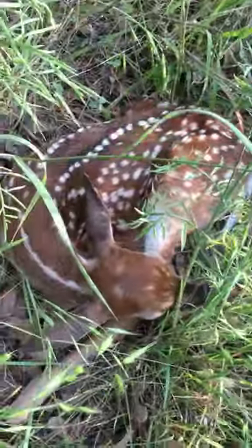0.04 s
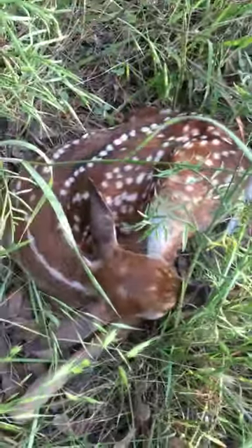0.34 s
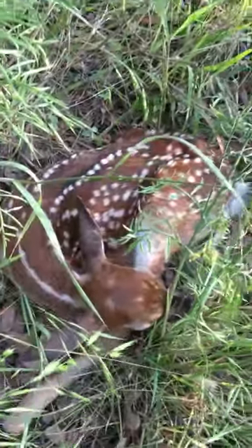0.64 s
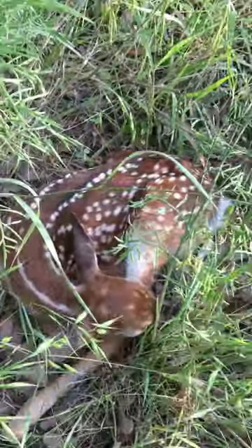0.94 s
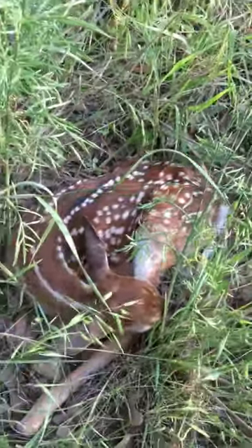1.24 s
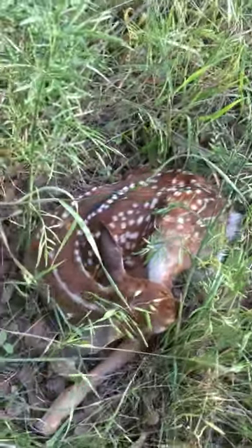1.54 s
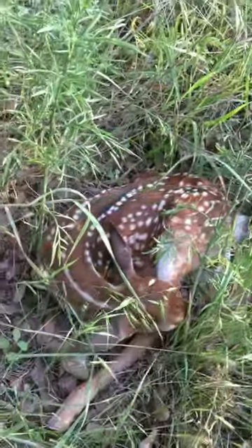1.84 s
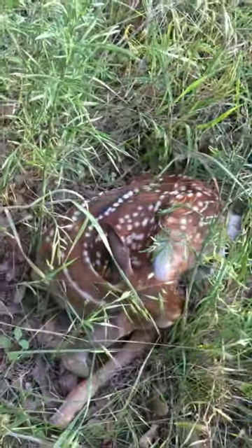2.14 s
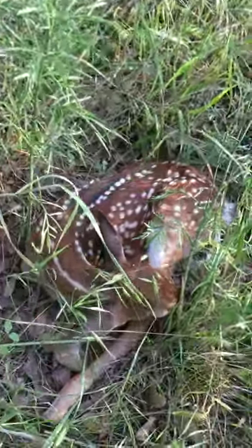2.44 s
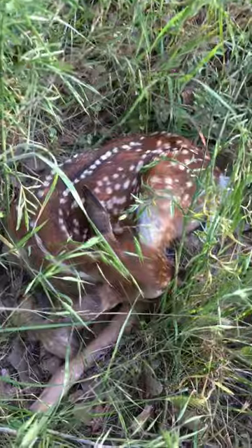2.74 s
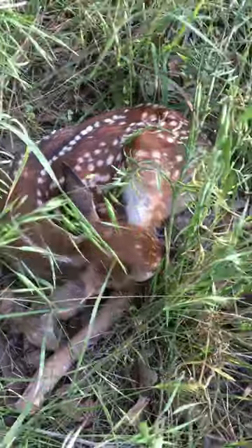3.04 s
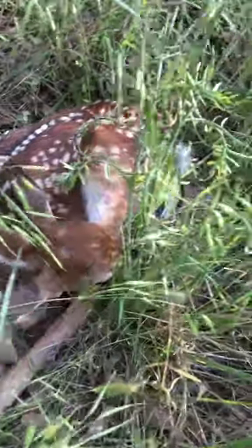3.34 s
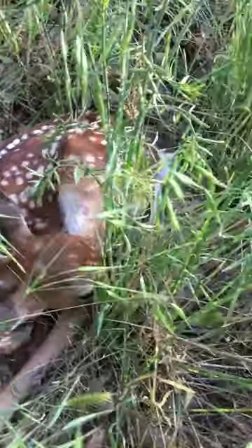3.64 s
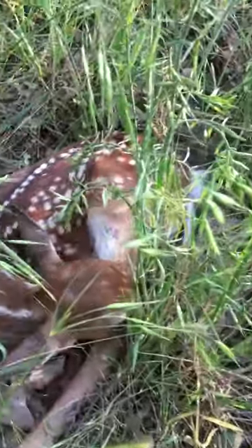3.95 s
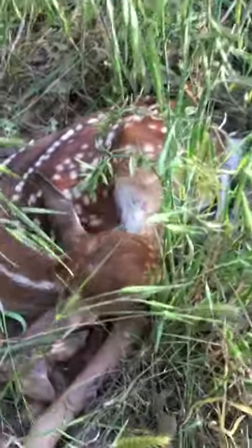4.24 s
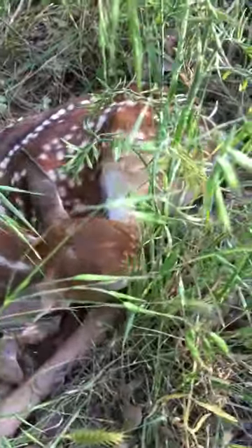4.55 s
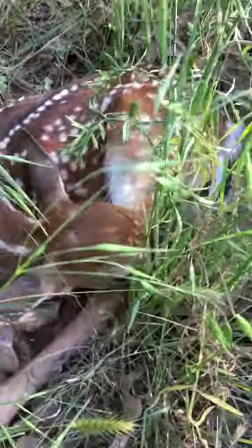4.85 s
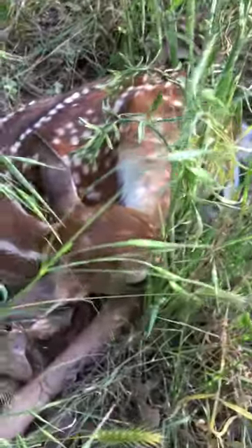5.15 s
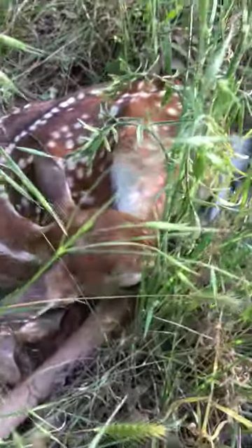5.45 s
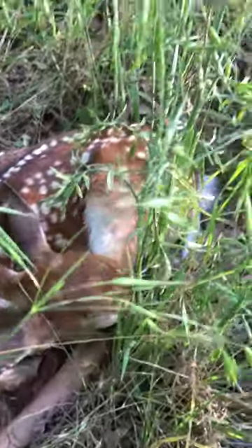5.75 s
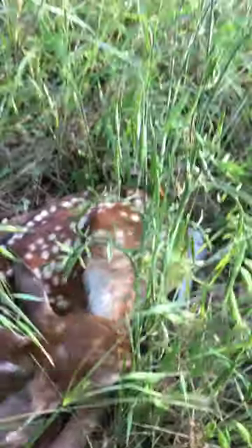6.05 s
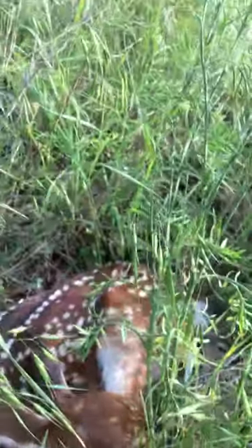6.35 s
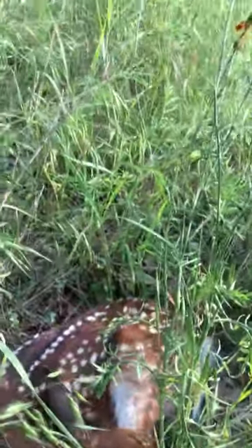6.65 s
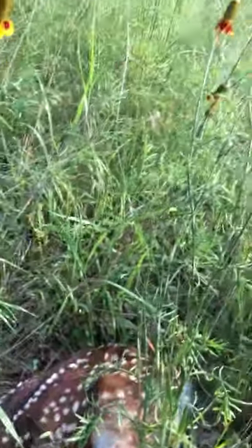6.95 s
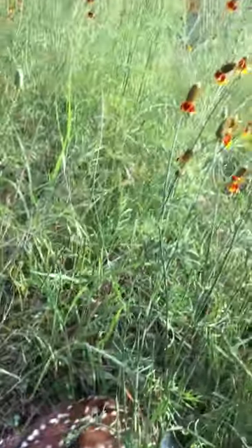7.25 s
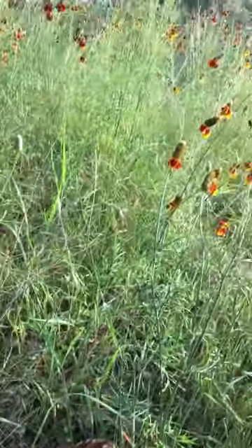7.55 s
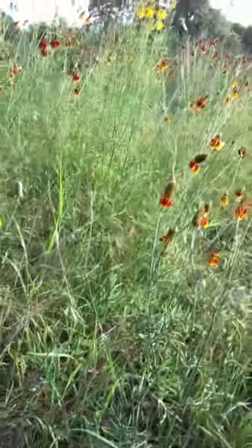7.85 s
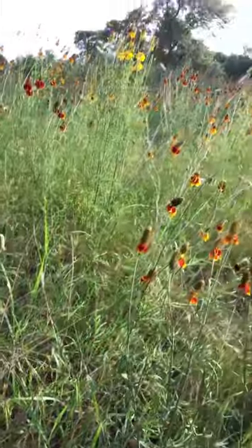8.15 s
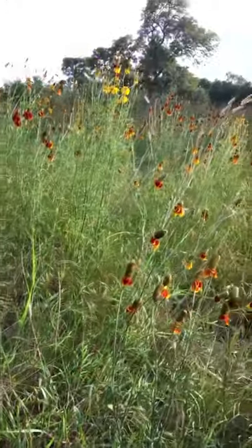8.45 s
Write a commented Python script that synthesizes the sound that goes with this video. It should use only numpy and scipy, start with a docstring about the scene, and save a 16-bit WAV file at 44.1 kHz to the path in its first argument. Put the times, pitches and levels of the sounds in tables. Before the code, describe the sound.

In a field of tall grass, a thin, high insect buzz runs throughout over a low drone and faint hiss. A bird gives a quick upward whistle, dry stems tick and far traffic dies away. Midway, close footsteps push through the grass with a sharp twig crack, crackling rustles and a dull scuff of soil. The rustling settles and distant birds whistle short, mostly rising notes.

```python
"""In a meadow of tall grass, katydids buzz by stridulation: each wing stroke draws a scraper along a
file of teeth, giving one arching tone near 9.5 kHz. Someone shifts in the grass, so blades rustle, stems
tick, twigs snap and the soil scuffs underfoot. Far birds whistle gliding notes, most of them rising.
Beneath lie a low rumble, a drone and a fine hiss; a soft, hollow rush of distant traffic and the hum
of a far engine fade early on."""
import sys
import numpy as np
from scipy import signal
from scipy.fft import rfft, irfft, next_fast_len
from scipy.io import wavfile
from scipy.ndimage import map_coordinates

SR = 44100
rng = np.random.default_rng(int(sys.argv[2]) if len(sys.argv) > 2 else 0)


def generate_wav(signal):
    """Clip the signal to [-1, 1] and save it as 16-bit WAV at the path in sys.argv[1]."""
    frames = np.transpose(np.atleast_2d(signal))
    scaled = np.clip(frames, -1, 1) * 32767
    pcm = np.round(scaled).astype(np.int16)
    wavfile.write(sys.argv[1], SR, pcm)


N = 374409


def amp(db):
    """Decibels to amplitude gain."""
    return 10 ** (np.asarray(db) / 20)


def unit(x):
    """Normalisation to rms 1."""
    return x / np.sqrt(np.mean(x ** 2) + 1e-20)


def curves(rows):
    """Linear interpolation: one value per sample for each column after the time."""
    s, *cols = np.transpose(rows)
    return [np.interp(np.arange(N) / SR, s, c) for c in cols]


def wobble(rate):
    """Random modulation: a smooth curve with rate knots a second."""
    return map_coordinates(rng.standard_normal(int(N * rate / SR) + 4), [np.arange(N) * rate / SR])


def coloured(x, points):
    """Spectral shaping of x by (Hz, dB) points on a log frequency axis, at rms 1."""
    f, db = np.transpose(points)
    size = next_fast_len(2 * len(x))
    hz = np.fft.rfftfreq(size, 1 / SR)
    gain = amp(np.interp(np.log(hz + 1), np.log(f), db))
    return unit(irfft(rfft(x, size) * gain, size)[:len(x)])


def noise(points):
    """Stationary noise with the given spectrum."""
    return coloured(rng.standard_normal(N), points)


def add(track, s, sound):
    """Superposition of a short sound on the track at time s."""
    part = track[max(round(s * SR), 0):][:len(sound)]
    part += sound[:len(part)]


def scattered(x, t60, wet_db):
    """Scattering: x plus weak echoes from plants, which change as the microphone moves."""
    t, echo, hop = np.arange(SR // 4) / SR, np.zeros(N), SR // 8
    padded = np.pad(x, (0, 2 * hop))
    for start in range(0, N, hop):
        tail = rng.standard_normal(len(t)) * amp(-60 * t / t60)
        piece = padded[start:start + 2 * hop] * np.sin(np.linspace(0, np.pi, 2 * hop))
        add(echo, start / SR, signal.fftconvolve(piece, tail / np.linalg.norm(tail)))
    return x + amp(wet_db) * echo


# One wing stroke. Each row: share of the cycle, tooth strike rate in Hz at pitch 1, relative level in dB.
WING_STROKE = [(0, 8600, -50), (.15, 8500, -35), (.23, 8850, -5.5), (.35, 9250, -1.5), (.45, 9490, 0),
               (.53, 9550, 0), (.62, 9400, -1), (.72, 8950, -4.5), (.82, 8400, -11.5), (.9, 7950, -26),
               (1, 7900, -50)]

def stridulate(rate, pitch, slip, scatter_db):
    """Stridulation: the scraper speeds up and slows along the file, so each stroke arches in pitch."""
    cycle = np.cumsum(rate * (1 + .003 * wobble(4) + .0089 * wobble(40))) / SR % 1
    share, hz, db = np.transpose(WING_STROKE)
    drift = 1 + .0025 * wobble(7)
    strikes = np.cumsum(pitch * drift * np.interp(cycle, share, hz)) / SR
    # the scraper never catches the teeth quite the same way twice
    tone = np.sin(2 * np.pi * strikes + slip * wobble(110) + .1 * wobble(1500))
    return unit(tone * amp(np.interp(cycle, share, db) + scatter_db * wobble(70)))


# The song. Each row: time in seconds, relative levels in dB of the nearest katydid and of the others.
SONG_LEVELS = [(0.1, -59, -69), (1.58, -58.5, -64.5), (3.01, -56.5, -66), (3.1, -55, -64.5),
               (5.46, -59, -66.5), (6.09, -58, -66), (6.87, -61.5, -65.5), (7.33, -57.5, -64),
               (8.4, -53, -63.5)]
# The strokes' low ends as the microphone tilts up. Each row: time in seconds, level in dB.
LOW_END_LEVEL = [(0, -92), (6, -87), (6.7, -79), (8.49, -77.5)]
# Farther katydids. Each row: strokes a second, pitch ratio to the nearest, relative level in dB.
FAR_SINGERS = [(60.8, 1.058, -10.5), (74.1, 1.079, -11), (57.64, 1.037, -11)]
# The farthest, merged. Each row: frequency in Hz, relative spectral density in dB.
CHORUS_SPECTRUM = [(8000, -45), (8600, -24), (9200, -6), (9600, -7.5), (10050, -6.5), (10300, -16),
                   (10430, -7.5), (10560, -41.5)]

def katydids():
    """Superposition: one close singer stands clear while farther ones blur into a chorus."""
    near_db, far_db = curves(SONG_LEVELS)
    singer = stridulate(rate=66.5, pitch=1, slip=1.1, scatter_db=.3)
    near = scattered(singer, t60=.02, wet_db=-19)
    flicker = amp(3 * wobble(25) + 2 * wobble(3))
    low_band = coloured(singer, [(6000, -20), (7800, -5), (8200, 0), (8600, -10), (9000, -40)])
    low_end = amp(curves(LOW_END_LEVEL)[0]) * flicker * low_band
    far = sum(amp(db) * stridulate(rate, pitch, slip=2, scatter_db=.6) for rate, pitch, db in FAR_SINGERS)
    chorus = unit(far) + amp(.5) * noise(CHORUS_SPECTRUM)
    return amp(near_db - .76) * unit(near) + low_end + amp(far_db + 4) * unit(chorus)


# Four background noises. Each row: frequency in Hz, relative spectral density in dB.
RUMBLE_SPECTRUM = [(12, -45), (24, -12.5), (36, -3), (56, 8.5), (72, 5), (94, 8.5), (115, 4.5), (150, -41)]
DRONE_SPECTRUM = [(80, -21), (128, 0), (155, 1.5), (180, -3.5), (250, -9), (315, -15.5), (400, -18.5),
                  (520, -25.5), (800, -46.5)]
TRAFFIC_SPECTRUM = [(350, -13.5), (500, -5.5), (630, 3), (900, 2.5), (1200, -1), (1500, -4), (2000, -13.5),
                    (3000, -21), (5000, -48)]
HISS_SPECTRUM = [(500, -10), (1500, 1), (2500, 2), (3500, 0), (4500, -2), (5500, -1), (6500, 0), (7700, -3),
                 (10800, .5), (11800, 2), (13000, 2.5), (16000, 2.5)]
# Their envelopes. Each row: time in seconds, relative level in dB.
RUMBLE_LEVEL = [(0.1, -56.5), (2.18, -49.5), (3.89, -56.5), (4.52, -50), (4.81, -54.5), (5.05, -51.5),
                (5.58, -58), (6.02, -51), (6.11, -62.5), (6.62, -51), (6.71, -59.5), (6.78, -46.5),
                (6.85, -54.5), (8.0, -54.5), (8.12, -60), (8.4, -54.5)]
DRONE_LEVEL = [(0.1, -54.5), (0.31, -56), (2.41, -54.5), (3.33, -52), (4.81, -55), (5.39, -52.5),
               (5.99, -55.5), (8.1, -54.5), (8.4, -56)]
TRAFFIC_LEVEL = [(0.05, -54), (0.54, -60), (1.1, -59), (2.33, -61.5), (2.72, -65.5), (3.17, -65.5),
                 (5.72, -68.5), (7.98, -65.5), (8.4, -66)]
# The traffic's hollow note. Each row: time in seconds, centre in Hz, level in dB over its broad rush.
HOLLOW_NOTE = [(0, 846.8, 5.5), (.4, 855, -1), (.7, 913, -1.5), (1.2, 1057, 0), (1.7, 921, -2),
               (2.4, 989, -3.5), (2.8, 909, -10), (8.49, 893, -31)]

def background():
    """Ambient noise in bands: rumble, drone, the soft, hollow rush of distant traffic and a hiss."""
    rumble = amp(curves(RUMBLE_LEVEL)[0]) * noise(RUMBLE_SPECTRUM)
    drone = amp(curves(DRONE_LEVEL)[0] + .14) * noise(DRONE_SPECTRUM)
    centre_hz, hollow_db = curves(HOLLOW_NOTE)
    # ring modulation carries narrow noise along the drifting centre
    carrier = np.sin(2 * np.pi * np.cumsum(centre_hz) / SR)
    hollow = unit(noise([(60, 4), (130, 1), (300, -12.5), (900, -65)]) * carrier)
    traffic = (noise(TRAFFIC_SPECTRUM) + amp(hollow_db) * hollow) / np.hypot(1, amp(hollow_db))
    hiss = amp(-70.4) * noise(HISS_SPECTRUM)
    return rumble + drone + amp(curves(TRAFFIC_LEVEL)[0] + 1) * traffic + hiss


# The engine's wavering lines. Each row: frequency in Hz, relative level in dB.
ENGINE_LINES = [(56, 2), (94, 3), (133, 2), (154, 0.5)]
# Their envelope. Each row: time in seconds, gain in dB.
ENGINE_LEVEL = [(0, -55.5), (.8, -56), (1.2, -57), (1.8, -60), (2.4, -61.5), (3, -74), (8.49, -77)]

def engine():
    """Attenuation with distance: only the lowest orders of a far engine carry across the field."""
    t = np.arange(N) / SR
    lines = sum(amp(db + .4 * wobble(10)) * np.sin(2 * np.pi * hz * t + .82 * wobble(7))
                for hz, db in ENGINE_LINES)
    return amp(curves(ENGINE_LEVEL)[0]) * lines


def crackle(rate, spread_db, points):
    """Shot noise: tiny fractures at random moments, each ringing briefly at its own pitch."""
    count = int(rate * N / SR)
    when, pitch, size = rng.random((count, 3)).T
    age = np.arange(48)  # samples
    hz = 1500 * 10 ** pitch
    turns = hz[:, None] * age / SR
    strength = amp(-spread_db * np.log(np.maximum(size, .004)))
    grains = strength[:, None] * np.sin(2 * np.pi * turns) * np.exp(-turns / 3.8)
    at = (when * N).astype(int)[:, None] + age
    return coloured(np.bincount(at.ravel(), grains.ravel(), N)[:N], points)


def swell(s, hold_s, fade_s):
    """Exponential envelope of a contact: it rises 20 dB in fade_s, holds from time s, falls as fast."""
    t = np.arange(N) / SR
    outside = np.maximum(np.maximum(s - t, t - s - hold_s), 0)
    return amp(-20 * outside / fade_s)


# Rustling blades and stems. Each row: frequency in Hz, relative spectral density in dB.
BLADE_SPECTRUM = [(5000, -27), (7000, -15), (9000, -13), (11500, 8), (13500, 13.5), (16000, 10)]
STEM_SPECTRUM = [(300, -10.5), (550, -7), (1500, -10), (2500, -2.5), (4500, -1.5), (5800, 2.5), (8000, 1.5),
                 (11000, -11)]
# Blades stirring between brushes. Each row: time in seconds, level in dB.
STIR_LEVEL = [(0, -75), (2.5, -90), (5.8, -78), (6.8, -85), (8.49, -91)]
# Legs brushing the grass. Each row: start, hold and fade in seconds, blade and stem levels in dB.
BRUSHES = [(.62, 0.055, .1, -71, -76), (2.19, .17, .25, -64, -73), (2.787, .2, 0.38, -65.5, -71),
           (3.154, 0.19, 0.23, -50, -57), (3.536, 0.054, 0.17, -51.5, -56.5), (3.68, 0.085, 0.55, -62, -65),
           (4.13, .13, 0.65, -67, -68), (4.36, 0.18, .15, -70, -71.5), (4.857, .04, .1, -67, -82),
           (5.87, 0.035, .15, -65, -88), (5.94, 0.021, 0.066, -57, -74), (6.143, .025, .07, -63, -84)]

def grass():
    """Incoherent sources add in power: light touches crackle, a firm push merges them into a swish."""
    stir = amp(curves(STIR_LEVEL)[0])
    blades_power, stems_power = stir ** 2, (amp(-3.5) * stir) ** 2
    for s, hold_s, fade_s, blades_db, stems_db in BRUSHES:
        push = swell(s, hold_s, fade_s)
        blades_power += (amp(blades_db) * push) ** 2
        stems_power += (amp(stems_db) * push) ** 2
    swish = np.clip(.32 + .057 * (10 * np.log10(blades_power) + 69), .3, 1.2)
    blades = crackle(rate=2200, spread_db=5, points=BLADE_SPECTRUM) + swish * noise(BLADE_SPECTRUM)
    stems = crackle(rate=2800, spread_db=4.5, points=STEM_SPECTRUM) + swish * noise(STEM_SPECTRUM)
    clumps = amp(2 * wobble(28))  # blades catch and let go in clumps
    return clumps * (np.sqrt(blades_power) * blades + np.sqrt(stems_power) * stems) / np.hypot(1, swish)


# Bent stalks ticking. Each row: time in seconds, level in dB.
CREEP_LEVEL = [(0, -78), (4.6, -77), (6.2, -78), (6.8, -86), (8.49, -88)]

def stalks():
    """Elastic recovery: bent stalks creep back with fine ticks until the walker stands still."""
    return amp(curves(CREEP_LEVEL)[0]) * crackle(rate=110, spread_db=3.8, points=BLADE_SPECTRUM)


def whistle(length_s, glide_hz, bend=1):
    """Frequency glide: a pure tone swells and fades between two pitches; more bend delays the glide."""
    progress = np.linspace(0, 1, int(length_s * SR))
    start_hz, end_hz = glide_hz
    hz = start_hz * (end_hz / start_hz) ** (progress ** bend)
    return np.sin(np.pi * progress) * np.sin(2 * np.pi * np.cumsum(hz) / SR)


# One bird's quick upward whips. Each row: start and length in seconds, relative level in dB.
WHIPS = [(0.043, 0.1, -57), (.41, .075, -69), (8.012, 0.056, -61.5), (8.282, .055, -56)]
# Another's three-part call. Each row: start in seconds, relative levels in dB of held note and slur.
RISING_CALLS = [(5.985, -74, -74.5), (6.54, -68.5, -69.5), (6.885, -69.5, -69), (7.022, -69, -62),
                (7.357, -76, -70), (7.513, -73, -64), (7.855, -80, -72)]
# A soft falling note further off. Each row: start in seconds, relative level in dB.
PEEPS = [(6.48, -71), (6.97, -67), (7.455, -71.5)]

def birds():
    """Outdoor propagation: repeated whistles waver on their way, trailed by the meadow's echo."""
    out = np.zeros(N)
    for s, length_s, db in WHIPS:
        whip = whistle(length_s, glide_hz=(1875, 3640), bend=1.5)
        fade_db = 6.5 * np.linspace(0, 1, len(whip))  # a whip weakens as it climbs
        add(out, s, amp(db - fade_db) * whip)
    for s, held_db, slur_db in RISING_CALLS:
        pitch = 1 + .012 * rng.standard_normal(2)  # scatter from call to call
        held = whistle(length_s=.07, glide_hz=pitch * (2750, 2810))
        slur = whistle(length_s=.1, glide_hz=pitch * (2970, 3780))
        flourish = whistle(length_s=.088, glide_hz=pitch * (4120, 4950))
        add(out, s, amp(held_db) * held)
        add(out, s + .058, amp(slur_db) * slur)
        add(out, s + .15, amp(slur_db - 13) * flourish)
    for s, db in PEEPS:
        add(out, s, amp(db) * whistle(length_s=.054, glide_hz=(2380, 2220)))
    waver = amp(2.6 * wobble(110) - 2.5)
    return scattered(out * waver, t60=.6, wet_db=-4.5)


# The loudest stems springing free. Each row: start in seconds, then relative levels in dB of the peak,
# the body around 3 kHz and the brightness around 13 kHz.
STEM_TICKS = [(0.0885, -34, -38, -6), (0.133, -39, -27, -10), (0.2138, -29, -38.5, -25),
              (0.2677, -36, -26, -11), (0.2793, -34, -37, -20), (0.323, -31.5, -26, -16.5),
              (0.33, -33, -35, -16), (0.627, -34, -27.5, -22), (0.814, -35, -31, -7),
              (1.1764, -42, -24, -2), (1.2156, -36, -32, -4), (1.949, -40, -18, -13),
              (2.1298, -34, -26, -10.5), (2.2114, -37, -38, -24), (2.3824, -40, -31, -22),
              (3.0553, -27, -25, -7.5), (3.172, -23.5, -29, -15), (3.257, -22, -34, -17),
              (3.287, -32, -26, -24), (3.3529, -29, -37, -16), (3.3963, -25, -18, -2.5),
              (3.586, -32.5, -32, -30), (3.64, -30.5, -36, -22), (3.918, -37, -25, -8),
              (3.9444, -38.5, -18, -18), (4.2657, -30.5, -22, 1), (4.5488, -36.5, -11, -3),
              (5.957, -37.5, -31.5, -20), (7.9794, -43, -28, -22), (8.0153, -47, -27, -27)]

def ticks(snap_s, t60, tail_db, level_db):
    """Impulsive release: a freed stem gives a dry snap, brighter if it is thin, then a faint shiver."""
    out, t = np.zeros(N), np.arange(SR // 40) / SR
    snap = np.exp(-((t - .001) / snap_s) ** 2)
    shiver = (t > .001) * amp(tail_db - 60 * t / t60)
    for s, db, body_db, bright_db in STEM_TICKS:
        burst = rng.standard_normal(len(t)) * (snap + shiver)
        body = [(500, body_db - 10), (2800, body_db), (4800, body_db + 3.5), (7000, -26.5)]
        treble = [(12500, bright_db - 7), (15500, bright_db - 4), (17000, -56)]
        tick = coloured(burst, body + treble)
        add(out, s, amp(db + level_db) * tick / np.abs(tick).max())
    return out


# A twig's modes. Each row: frequency in Hz at pitch 1, relative level in dB, 60 dB decay time in seconds.
TWIG_MODES = [(780, 1.5, 0.014), (1460, -1.5, 0.0083), (2510, -5, 0.0086), (5500, -3, 0.003)]
# Twigs breaking underfoot. Each row: start in seconds, gain in dB, pitch ratio.
TWIG_SNAPS = [(3.024, -26.5, 0.96), (4.227, -44.5, 1.53), (4.548, -48.5, 3)]

def twigs():
    """Damped modes: a breaking twig rings until the ground stills it; thinner ones ring higher."""
    out, t = np.zeros(N), np.arange(SR // 20) / SR
    attack = 1 - np.exp(-t / .0005)
    for s, db, pitch in TWIG_SNAPS:
        ring = sum(amp(level - 60 * t / t60) * np.cos(2 * np.pi * pitch * hz * t)
                   for hz, level, t60 in TWIG_MODES)
        crack = .4 * amp(-60 * t / .006) * rng.standard_normal(len(t))
        add(out, s, amp(db) * (ring + crack) * attack)
    return out


# Scuffed soil. Each row: frequency in Hz, relative spectral density in dB.
SOIL_SPECTRUM = [(200, -28), (350, -10), (530, 2.5), (800, -7), (1300, -12), (2500, -20)]
# A shoe pressing down. Each row: start and hold in seconds, level in dB.
SHOE_PRESSES = [(3.1, 0.89, -73), (4.18, 0.39, -66)]

def soil():
    """Contact noise: the ground gives a dull scuff as weight comes onto a shoe."""
    weight = sum(amp(db) * swell(s, hold_s, fade_s=.22) for s, hold_s, db in SHOE_PRESSES)
    return weight * noise(SOIL_SPECTRUM)


def scene():
    """Superposition: all sources sum at one microphone."""
    meadow = katydids() + background() + engine() + grass() + stalks() + birds()
    stems = ticks(snap_s=.0007, t60=.019, tail_db=-7, level_db=-4)
    return (meadow + stems + twigs() + soil())[None]


def record(dry):
    """Linear filtering: the microphone port dulls a band near 5 kHz; the recorder is band-limited."""
    size = next_fast_len(N + SR // 2)
    hz = np.fft.rfftfreq(size, 1 / SR)
    port = amp(-4.5 * np.exp(-((hz - 4930) / 260) ** 2))
    passband = hz < 15900
    return irfft(rfft(dry, size) * port * passband, size)[:, :N]


dry = scene()
out = record(dry)
generate_wav(out)
```